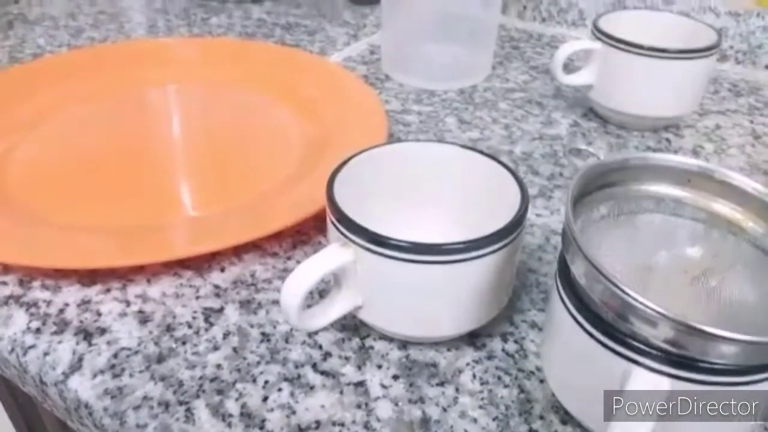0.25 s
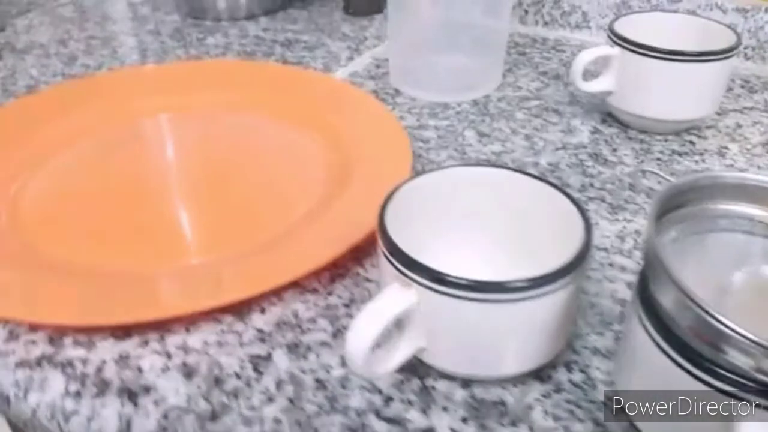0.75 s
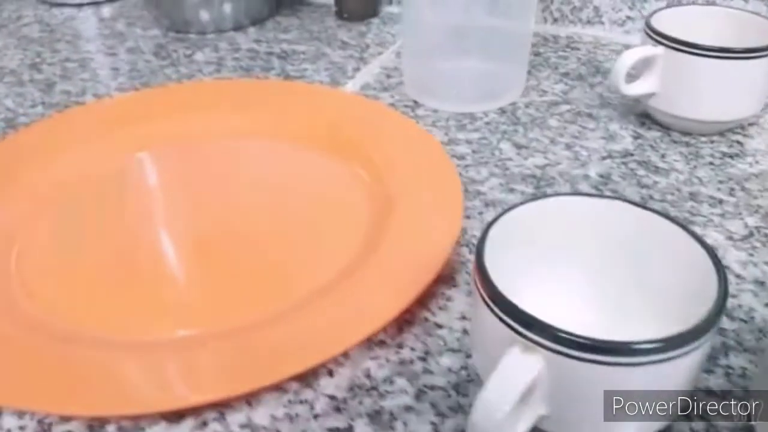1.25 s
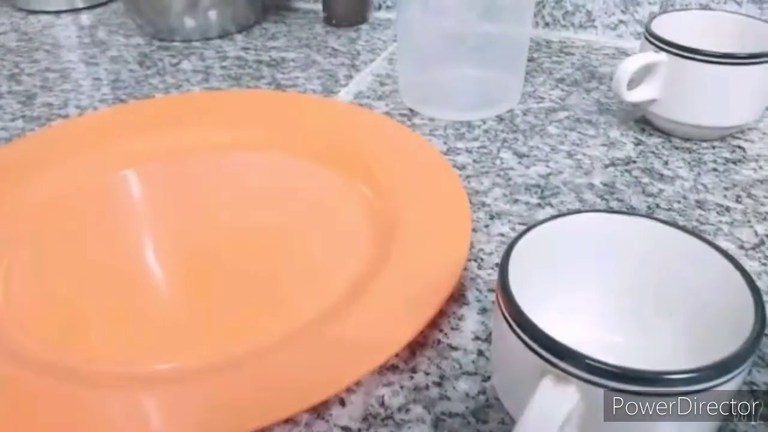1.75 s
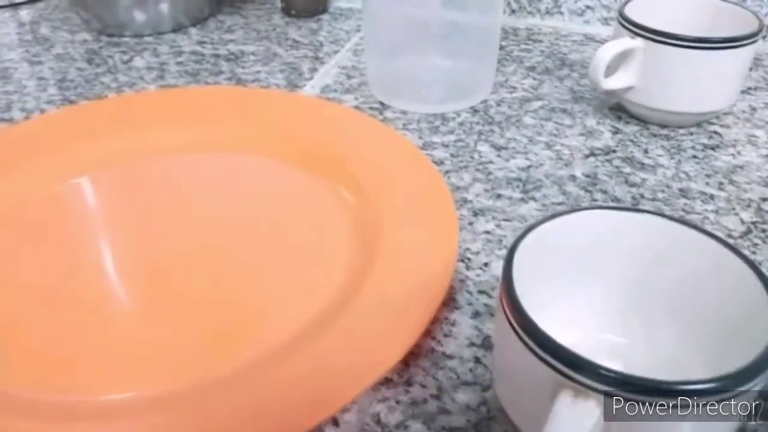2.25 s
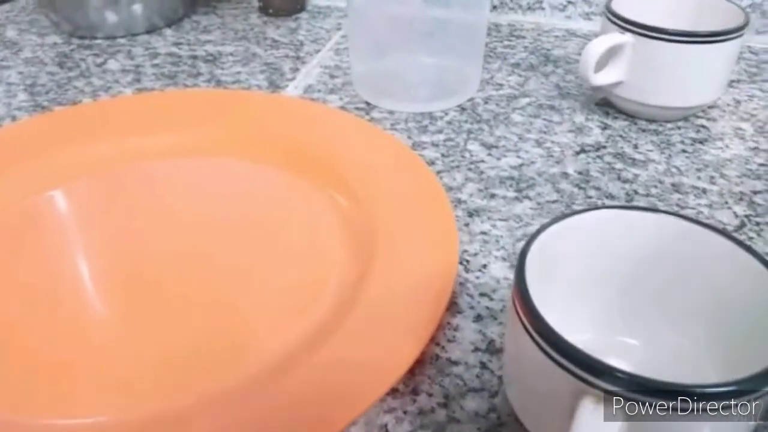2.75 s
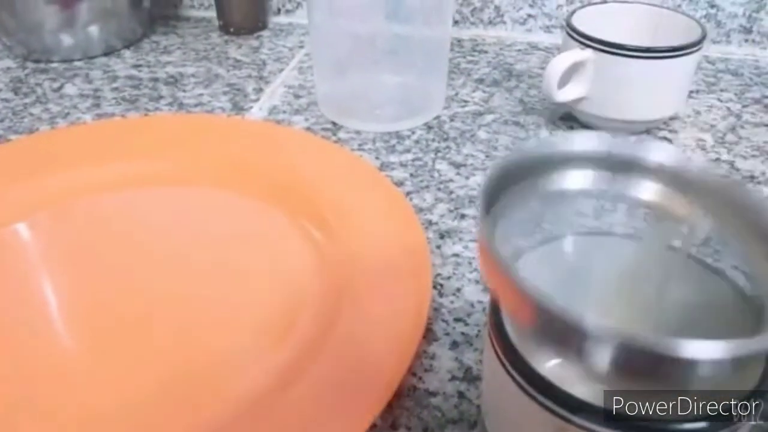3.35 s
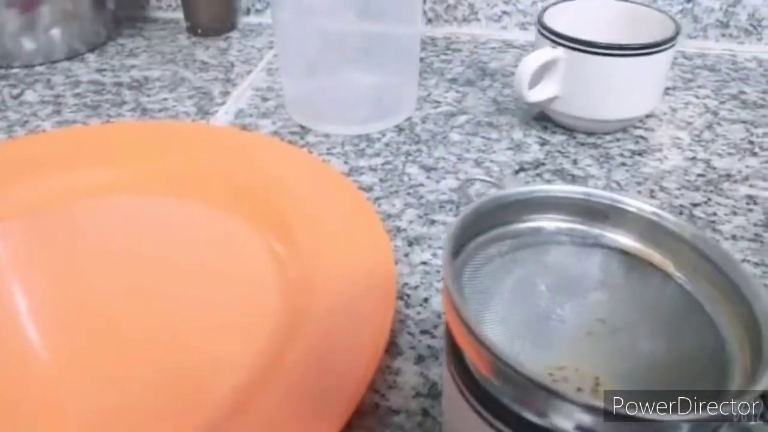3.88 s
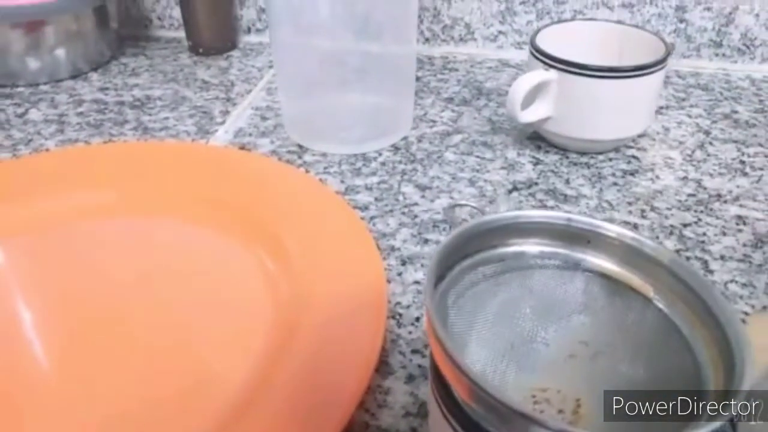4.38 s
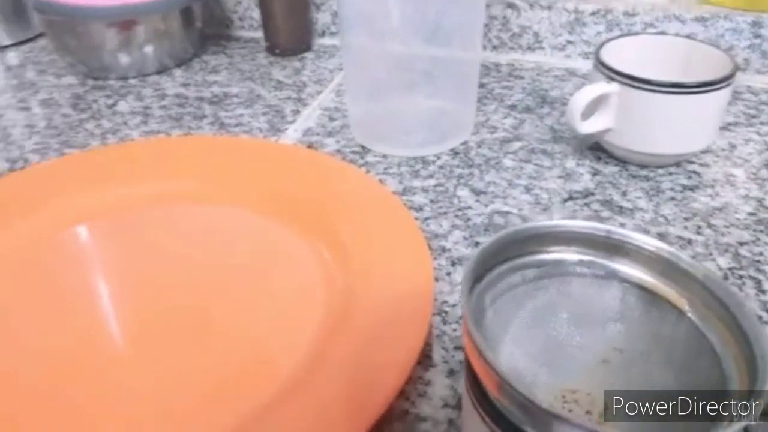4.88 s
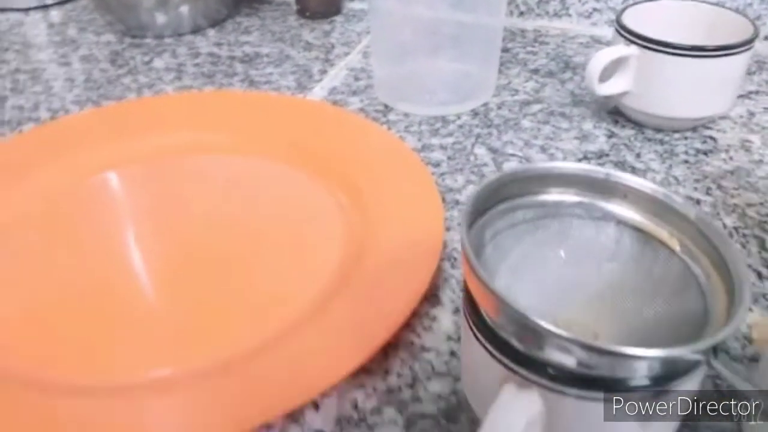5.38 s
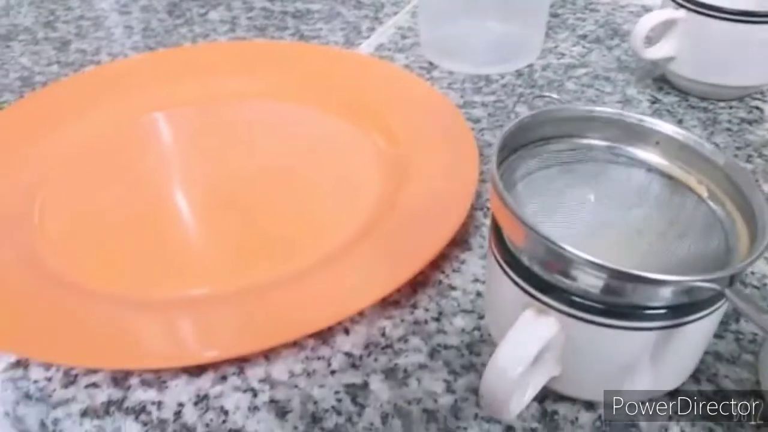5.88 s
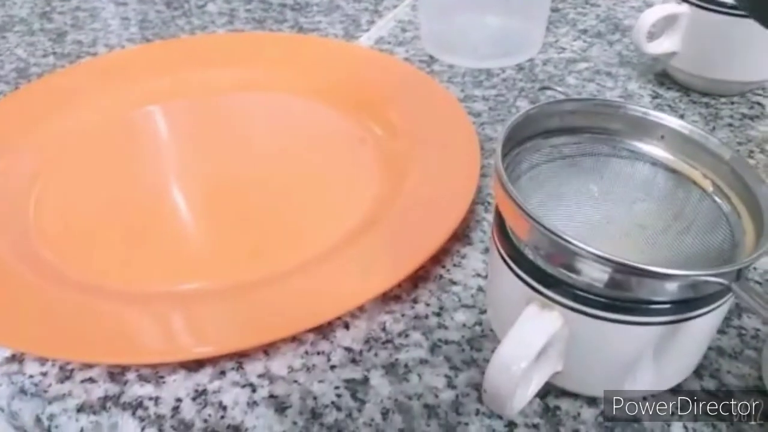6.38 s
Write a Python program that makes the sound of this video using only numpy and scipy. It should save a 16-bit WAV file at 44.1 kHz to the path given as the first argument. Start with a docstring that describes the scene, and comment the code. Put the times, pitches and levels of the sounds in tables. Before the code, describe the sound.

Close-up kitchen handling: quiet room hum and soft rubbing first, then a saucepan landing on a stone counter in two quick knocks and shifting with thin metallic ticks. A strainer taps dully on a cup, slides on its rim and seats with a sharp, clear clink. A small scrape of thin steel follows, and gentle rubbing closes it, with brief hard-walled echoes around each blow.

```python
"""A steel saucepan knocks twice on a stone countertop and rattles as it is shifted; a metal strainer is set on a
ceramic cup, slides on the rim and drops home with a bright clink; later some light metalware scrapes.
Blows are short noise cracks plus fading sine modes; scrapes are gritty noise that sets the same modes singing.
A small hard kitchen answers each blow; squeaks, soft rubbing and a slowly sinking room noise lie underneath."""
import sys
import numpy as np
from scipy import signal
from scipy.fft import rfft, irfft, next_fast_len
from scipy.io import wavfile

SR = 44100
rng = np.random.default_rng(int(sys.argv[2]) if len(sys.argv) > 2 else 0)


def store_pcm(level_fs):
    """Save levels as 16-bit WAV."""
    pcm = np.round(np.clip(level_fs, -1, 1) * 32767).astype(np.int16)
    wavfile.write(sys.argv[1], SR, np.atleast_2d(pcm).T)


N = 292383
T = np.arange(N) / SR
RING_T = T[:SR // 2]  # the half second given to each ring

# ways thin steel vibrates: (pitch_hz, time_to_fall_60_db_s, level_db)
THIN_STEEL_MODES = [(1868, 0.051, 3.5), (2790, 0.11, -1.5), (3800, 0.079, -10), (4300, 0.076, 2),
                    (4740, .06, -2), (5056, 0.13, -4), (6120, 0.048, -17.5), (6050, 0.054, 0),
                    (6760, 0.071, -5), (7050, .06, -17), (8100, 0.072, 1.5), (8300, 0.1, -3.5),
                    (10540, 0.069, -1.5), (12000, .05, 1), (13100, .05, -9)]
# colour of the noise when thin steel is touched: (frequency_hz, relative_level_db)
THIN_STEEL_COLOUR = [(30, -36), (200, 0.5), (1200, -7), (2500, -5), (4500, 1.5), (6500, 2), (8400, -0.5),
                     (9200, -11), (10400, -5), (13000, -3.5), (15500, -12.5)]


def amp(db):
    """Decibels to gain."""
    return 10 ** (np.asarray(db) / 20)


def unit(x):
    """Scale to an average strength (rms) of 1."""
    return x / np.sqrt(np.mean(x ** 2))


def fade(t60):
    """Half a second of exponential decay that falls 60 dB in t60 seconds."""
    return np.exp(-np.log(1000) * RING_T / max(t60, 1e-3))


def colour(x, spectrum):
    """Shape a noise by (frequency_hz, level_db) points; rms 1."""
    point_hz, point_db = np.transpose(spectrum)
    size = next_fast_len(len(x))
    hz = np.maximum(np.fft.rfftfreq(size, 1 / SR), 1)
    gain = amp(np.interp(np.log(hz), np.log(point_hz), point_db))
    return unit(irfft(rfft(x, size) * gain, size)[:len(x)])


def walk(rate):
    """Random wander of spread near 1, with straight lines between `rate` new values per second."""
    knots = np.arange(0, T[-1] + 1, 1 / rate)
    return np.interp(T, knots, rng.standard_normal(len(knots)))


def waver(hz, width):
    """A tone whose strength and phase wander, faster for a larger width; rms 1."""
    phase = 2 * np.pi * hz * T
    return unit(walk(width) * np.cos(phase) + walk(width) * np.sin(phase))


def grit(rough_db):
    """Noise whose strength jumps about like many tiny catches."""
    return rng.standard_normal(N) * amp(rough_db * walk(400))


def add(track, s, sound):
    """Mix a sound in at a time in seconds."""
    i = max(int(s * SR), 0)
    track[i:i + len(sound)] += sound[:N - i]


def ring(modes, place=0, detune=0):
    """Free vibration of a struck object; where it is struck decides how much each mode takes."""
    phase = 2 * np.pi * (1 + detune / 100) * RING_T  # detune in percent
    out = np.zeros(len(RING_T))
    for k, (hz, t60, *db) in enumerate(modes):
        level_db = db[0] + place * (db[-1] - db[0])
        sign = (-1) ** k
        out += sign * amp(level_db) * np.sin(hz * phase) * fade(t60)
    return out


def strikes(hits, modes, body, crack_t60, buzz_t60, buzz_db):
    """Each blow gives a crack, a short noisy buzz and a ring; softer contact takes the treble away."""
    out = np.zeros(N)
    for s, ring_db, crack_db, contact_hz, *manner in hits:
        envelope = fade(crack_t60) + amp(buzz_db) * fade(buzz_t60)
        crack = colour(rng.standard_normal(len(RING_T)), body) * envelope
        blow = amp(ring_db) * ring(modes, *manner) + amp(crack_db) * crack
        contact = signal.butter(2, min(contact_hz, .45 * SR), fs=SR, output="sos")
        add(out, s, signal.sosfilt(contact, blow))
    return out


def strokes(rows, attack_s, release_s):
    """Strength of rubbing: each stroke builds up, holds and dies away; attack and release span 60 dB."""
    strength = np.zeros(N)
    for s, length, db in rows:
        before = np.maximum(s - T, 0) / attack_s
        after = np.maximum(T - s - length, 0) / release_s
        strength += amp(db) * np.exp(-np.log(1000) * (before + after))
    return strength


def scrape(strength, modes, body, ring_db):
    """Gritty friction that also sets the object's modes singing."""
    force = grit(rough_db=4)
    singing = unit(signal.oaconvolve(force, ring(modes))[:N])
    return strength * (colour(force, body) + amp(ring_db) * singing)


def saucepan():
    """The pan lands on its edge, then its base, and rumbles over the stone."""
    # blows: (start_s, ring_db, crack_db, contact_treble_limit_hz, place from 0 edge to 1 base)
    pan_hits = [(1.66, -15, -16, 2560, 0.055), (1.6687, -24, -23, 1400, 0.72),
                (1.680, -23.5, -21, 1280, 0.61), (1.8118, -15.5, -16, 6440, 0.76),
                (1.858, -31.5, -30, 4000, 0.81), (1.996, -39, -34, 4000, 0.5),
                (2.056, -50, -30.5, 2520, 0.76), (2.160, -52, -53, 2500, 0.47),
                (5.110, -55, -37.5, 1800, 0)]
    # ways the pan vibrates: (pitch_hz, time_to_fall_60_db_s, edge_level_db, base_level_db)
    pan_modes = [(278.6, 0.46, -32.5, -19.5), (431.4, 0.42, -25.5, -23.5), (629, 0.12, -22, -20),
                 (795, 0.05, -3.5, -6), (865, 0.072, 0, -2), (895, 0.061, 0, -5.5), (972, 0.062, 2.5, -8.5),
                 (1032, 0.15, -2, -2), (1047.4, 0.19, 3, -16), (1243, 0.24, -13.5, -19),
                 (1854, 0.24, -23, -10), (1909, 0.15, 0.5, 0.5), (1927, 0.144, -12, -17),
                 (1337, .22, -24, -26), (1785, .22, -20, -25), (2950, .3, -21, -36), (3650, .16, -15, -13),
                 (2866, 0.04, -22, -3.5), (4510, 0.056, -4, -14), (5050, .1, -38, -9),
                 (5210, 0.11, -32, -17), (6600, 0.27, -19, -31)]
    # colour of the crack and buzz of pan on stone: (frequency_hz, relative_level_db)
    pan_colour = [(30, -37), (90, -18), (190, -15), (320, -5), (520, -22.5), (850, -5), (1500, -3.5),
                  (2400, -29.5), (4500, -10.5), (7000, -10), (9500, -30), (15000, -40)]
    # drags over the stone: (start_s, hold_s, level_db)
    pan_drags = [(1.88, .008, -45), (2.01, 0.014, -43.5)]
    load_detune = -0.49  # percent: the pan rings flatter the more of its base lies on the stone
    hits = [(*blow, place, load_detune * place) for *blow, place in pan_hits]
    blows = strikes(hits, pan_modes, pan_colour, crack_t60=0.024, buzz_t60=0.24, buzz_db=-19.0)
    # colour of the dragging noise: (frequency_hz, relative_level_db)
    rumble = [(40, -31), (90, -8.5), (300, -4.5), (600, -21.5), (1200, -17), (3000, -23.0), (10000, -39)]
    drag_strength = strokes(pan_drags, attack_s=0.14, release_s=0.61)
    return blows + scrape(drag_strength, pan_modes, rumble, ring_db=-8)


def strainer_on_cup():
    """The strainer touches the rim, slides along it and drops into the cup."""
    # blows: (start_s, ring_db, crack_db, contact_treble_limit_hz, place from 0 rim to rim to 1 seated)
    cup_hits = [(3.5607, -43, -47, 15000, 0.12), (3.5720, -32.5, -19.5, 2300, 0),
                (3.578, -49.5, -33.5, 2760, 0), (3.806, -43, -47.5, 1300, 0), (3.8492, -11, -15, 13700, 1)]
    # ways cup and strainer rim vibrate: (pitch_hz, time_to_fall_60_db_s, rim_level_db, seated_level_db)
    cup_modes = [(656, 0.09, -10, -26), (1125, 0.14, -4, -32.5), (1186, 0.13, -2.5, -41),
                 (1238, 0.21, -7, -27), (2350, 0.43, -6, -26.5), (2457, 0.051, -22, -3),
                 (2520, 0.15, 1, 1.5), (2563, 0.5, -8, -22), (3620, .08, -16.5, -43),
                 (4600, 0.061, -40, -33), (5075, 0.14, -29.5, -33), (5737, .3, -13, -22),
                 (5781, .3, -12, -19), (7644, .3, -8, -36), (9717, .2, -17, -30), (11825, .14, -12, -25),
                 (8450, .16, -16, -38), (11360, 0.27, -18, -30)]
    # colour of the contact noise: (frequency_hz, relative_level_db)
    cup_colour = [(30, -43), (100, -24.5), (300, -9), (700, -4), (1250, 4), (1900, -4), (3000, -1),
                  (4700, -1), (6600, -9.5), (7600, -8.5), (9500, -18.5), (13500, -6), (15500, -8.5)]
    # slides on the rim: (start_s, hold_s, level_db)
    rim_slides = [(3.625, .02, -54.5), (3.80, 0.063, -52)]
    blows = strikes(cup_hits, cup_modes, cup_colour, crack_t60=0.014, buzz_t60=0.29, buzz_db=-17.0)
    slide_strength = strokes(rim_slides, attack_s=0.1, release_s=0.16)
    return blows + scrape(slide_strength, cup_modes, cup_colour, ring_db=1.5)


def metalware():
    """Thin steel ticks and scrapes as it is handled."""
    # light metal ticks: (start_s, crack_db, ring_relative_to_crack_db)
    light_ticks = [(1.857, -30.5, -8), (1.8785, -24, -20), (1.9949, -35, -8), (2.0145, -25.5, -21),
                   (2.0179, -23.5, -20), (2.065, -37.5, -14), (2.127, -49.5, -5.5), (2.2520, -40, -16),
                   (2.737, -44, -15), (4.9485, -33.5, -17), (4.9885, -37, -18), (4.992, -33, -22),
                   (5.0072, -28, -17), (5.06, -33.5, -12), (5.191, -44.5, -15), (5.217, -45, -18)]
    # scrapes: (start_s, hold_s, level_db)
    steel_scrapes = [(1.885, .004, -49.5), (2.02, 0.038, -46), (2.30, 0.014, -57.5), (2.70, .03, -62.5),
                     (2.75, 0.022, -62), (4.60, .015, -57), (4.938, .005, -47.5), (4.995, 0.046, -47),
                     (5.11, 0.028, -64), (5.2, .012, -58.5)]
    contact_hz = 12500  # treble limit set by the hardness of steel on steel
    hits = [(s, db + ring_db, db, contact_hz) for s, db, ring_db in light_ticks]
    ticks = strikes(hits, THIN_STEEL_MODES, THIN_STEEL_COLOUR, crack_t60=0.014, buzz_t60=0.22, buzz_db=-17.5)
    strength = strokes(steel_scrapes, attack_s=0.097, release_s=0.34)
    friction = scrape(strength, THIN_STEEL_MODES, THIN_STEEL_COLOUR, ring_db=-8.5)
    return ticks + catches(strength) + friction


def catches(strength):
    """Tiny ticks at random moments while steel scrapes, their strength following the scrape."""
    catches_per_s, catch_db, spread_db, ring_db = 35, 1, 3.5, -11.5
    moments = rng.random(N) < catches_per_s / SR
    pulses = moments * strength * amp(catch_db + spread_db * rng.standard_normal(N))
    crack = colour(rng.standard_normal(len(RING_T)), THIN_STEEL_COLOUR) * fade(0.011)
    tick = crack + amp(ring_db) * ring(THIN_STEEL_MODES)
    return signal.oaconvolve(pulses, tick)[:N]


def knocks():
    """Soft bumps ring the counter; the near ones are fuller."""
    # bumps: (start_s, level_db, place from 0 far to 1 near)
    counter_knocks = [(.492, -42, 0), (1.997, -37, 0.57), (2.058, -37, 0.99), (2.124, -46.5, 1),
                      (2.201, -44, 0.69), (5.117, -45.5, 0.73)]
    # ways the counter vibrates: (pitch_hz, time_to_fall_60_db_s, far_level_db, near_level_db)
    counter_modes = [(90.6, 0.31, -22, -10), (200, .1, -8, -7), (279, 0.28, -18, -6),
                     (388, 0.24, 0.5, -11.5), (1140, 0.13, -32, 4)]
    out = np.zeros(N)
    for s, db, place in counter_knocks:
        add(out, s, amp(db) * ring(counter_modes, place))
    return out


def squeaks():
    """Light friction that swells and fades in one narrow resonance."""
    # faint squeaks and swishes of things being moved: (start_s, length_s, pitch_hz, width_hz, level_db)
    faint_squeaks = [(0, 1.84, 1244, 600.3, -66), (2.64, 0.2, 5520, 224, -63.5),
                     (2.66, 0.22, 2410, 109, -63.5), (2.72, 0.14, 2180, 130.3, -63),
                     (5.148, 0.92, 1906, 278.6, -68), (6.217, 0.5, 2185, 522, -70)]
    out = np.zeros(N)
    for s, length, hz, width, db in faint_squeaks:
        swell = np.sin(np.pi * np.clip((T - s) / length, 0, 1))
        out += amp(db) * swell * waver(hz, width)
    return out


def rubbing():
    """A soft hiss of rubbing close by, under wavering pressure."""
    # rubs: (start_s, hold_s, level_db)
    soft_rubs = [(0, .03, -61.5), (.38, 0.16, -63), (1.17, .04, -68), (2.82, 0.14, -67.5),
                 (4.22, .28, -70.5), (5.33, .04, -68), (5.5, 0.23, -65.5), (6.37, 0.3, -56)]
    # colour of the hiss: (frequency_hz, relative_level_db)
    rub_colour = [(500, 9), (1500, -21), (2100, 5.5), (2900, -1), (3900, 2.5), (6000, -0.5), (8300, -0.5),
                  (9300, -7), (11300, -5.5), (15500, -3)]
    uneven_db, uneven_per_s = 1.5, 30
    pressure = strokes(soft_rubs, attack_s=0.39, release_s=1.14) * amp(uneven_db * walk(uneven_per_s))
    return colour(grit(rough_db=1.5), rub_colour) * pressure


def room_noise():
    """Coloured noise that slowly sinks, with two low wavering drones."""
    # colour of the room noise: (frequency_hz, relative_level_db)
    air_colour = [(15, -52), (25, -21.5), (86, -2), (122, -3.5), (148, -4.5), (289, -1.5), (399, -6.5),
                  (445, -8.5), (614, -10.5), (1170, -9), (2300, -19.5), (7910, -31.5), (9550, -41),
                  (13200, -36), (15500, -43)]
    # drones: (pitch_hz, width_hz, level_db)
    room_drones = [(96.8, 7.2, -70), (284, 30, -68.5)]
    start_db, fall_db_per_s = -53, 0.65
    level_db = start_db - fall_db_per_s * T + .5 * walk(6.5)
    air = colour(rng.standard_normal(N), air_colour) * amp(level_db)
    return air + sum(amp(db) * waver(hz, width) for hz, width, db in room_drones)


def wall_echoes(count=60):
    """One echo from each mirror image of the source in the walls, weaker with distance."""
    # kitchen along each axis: (room_size_m, source_m, microphone_m)
    kitchen_box = [(3.37, .42, .61), (2.29, .83, 1.07), (2.71, .93, 1.19)]
    k = np.arange(-count, count + 1)
    offsets = []
    for length, source, mic in kitchen_box:
        image = k * length + np.where(k % 2, length - source, source)
        offsets.append(image - mic)
    x, y, z = np.ix_(*offsets)
    metres = np.sqrt(x ** 2 + y ** 2 + z ** 2).ravel()
    bounces = sum(np.ix_(abs(k), abs(k), abs(k))).ravel()
    sign = 1 - 2 * (bounces & 1)  # alternating signs keep the bass from piling up
    strength = (bounces > 0) * sign / metres  # the direct path is left out
    arrival = (metres / 343 * SR).astype(int)  # sound travels 343 m/s
    return np.bincount(arrival, strength)[:len(RING_T)]


def kitchen(x):
    """Direct sound, a few near reflections and a dense tail whose fading differs from band to band."""
    # reverberation: (octave_centre_hz, time_to_fall_60_db_s, level_db)
    room_bands = [(134, .6, -4.5), (257, 0.36, -4.5), (485, 0.37, 0), (985, 0.35, -3), (1830, 0.33, -4),
                  (4140, 0.46, -9), (8100, 0.38, -10.5), (15300, 0.41, -11)]
    # near reflections off the counter and tiles: (delay_s, level_db)
    near_echoes = [(.0031, -14.5), (.0083, -15), (0.0227, -15)]
    echoes, response = wall_echoes(), np.zeros(len(RING_T))
    build_up = 1 - np.exp(-RING_T / 0.021)
    for hz, t60, db in room_bands:
        edges = [hz / np.sqrt(2), min(hz * np.sqrt(2), .45 * SR)]
        band = signal.butter(2, edges, "bandpass", fs=SR, output="sos")
        tail = echoes * fade(t60) * build_up
        response += amp(db) * signal.sosfilt(band, tail / np.linalg.norm(tail))
    for s, db in near_echoes:
        response[int(s * SR)] += amp(db)
    return x + signal.oaconvolve(x, response)[:N]


def scene():
    """Blows and scrapes answered by the kitchen, with squeaks, rubbing and room noise added directly."""
    objects = saucepan() + strainer_on_cup() + metalware() + knocks()
    return (kitchen(objects) * amp(-2.0) + squeaks() + rubbing() + room_noise())[None]


def record(dry):
    """Thin the deepest bass below 42 Hz and cut the top steeply above 15450 Hz."""
    thin = signal.sosfilt(signal.butter(3, 42, "highpass", fs=SR, output="sos"), dry)
    return signal.sosfilt(signal.ellip(10, .2, 80, 15450, fs=SR, output="sos"), thin)


dry = scene()
out = record(dry)
store_pcm(out)
```